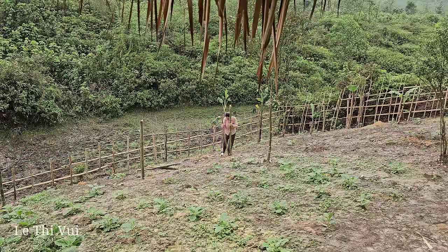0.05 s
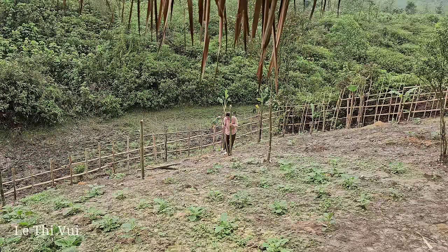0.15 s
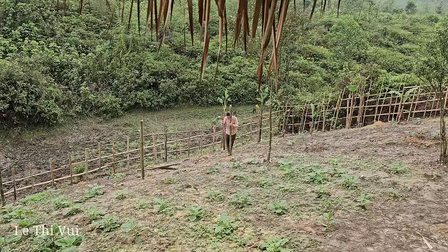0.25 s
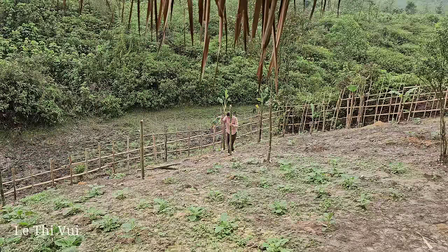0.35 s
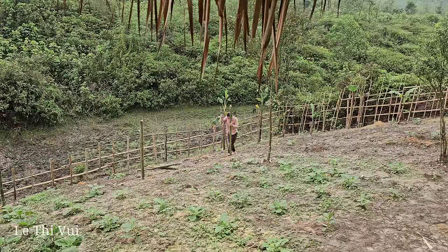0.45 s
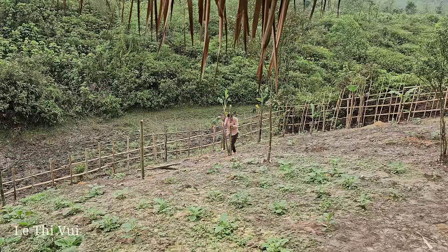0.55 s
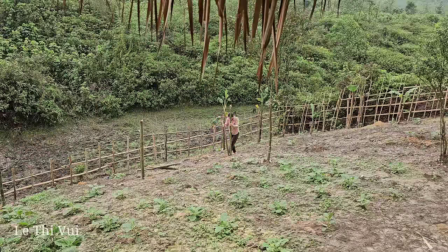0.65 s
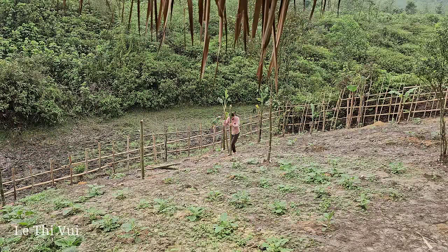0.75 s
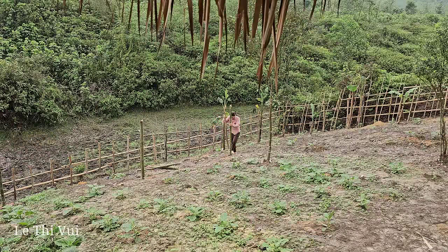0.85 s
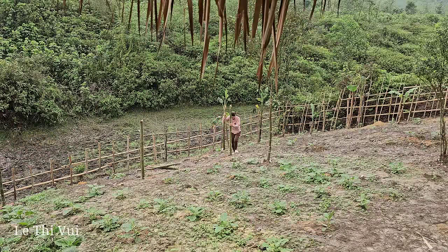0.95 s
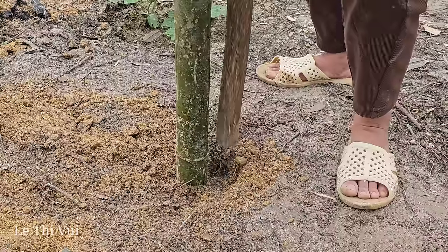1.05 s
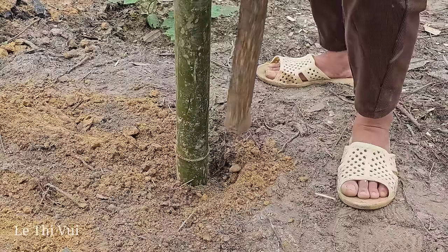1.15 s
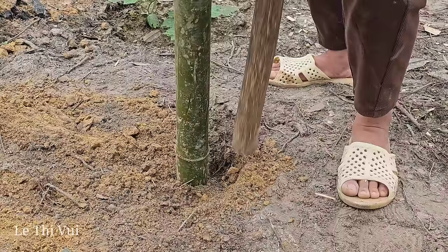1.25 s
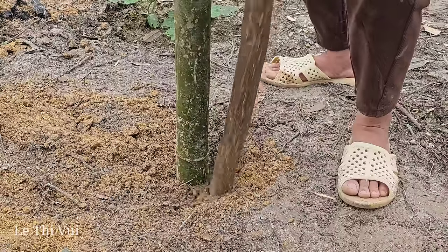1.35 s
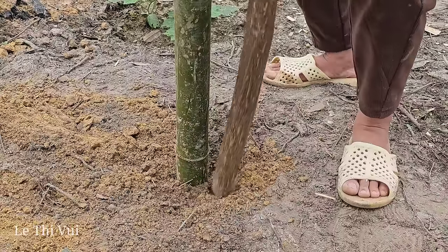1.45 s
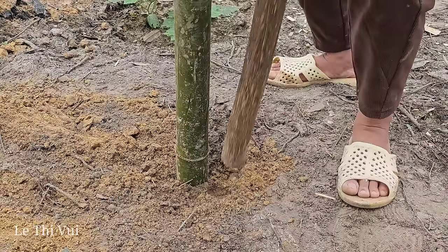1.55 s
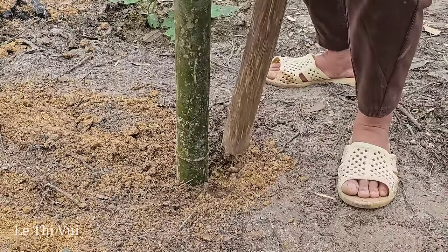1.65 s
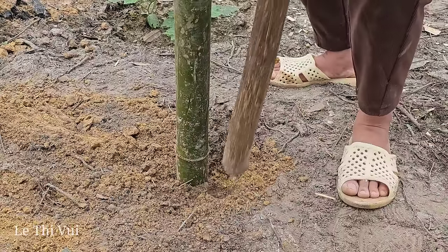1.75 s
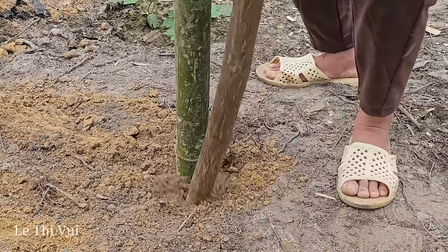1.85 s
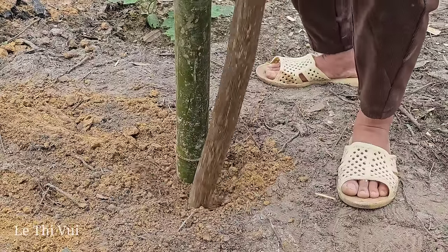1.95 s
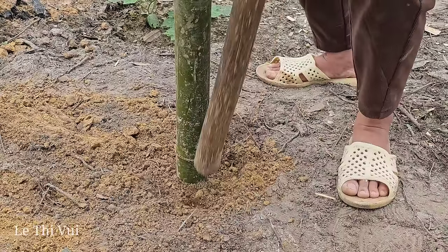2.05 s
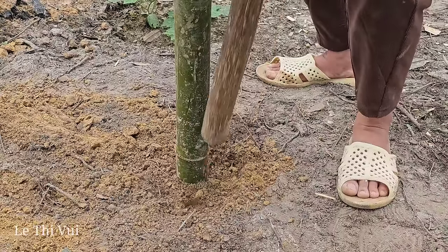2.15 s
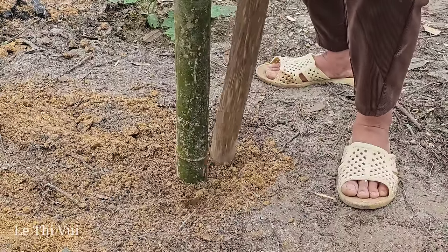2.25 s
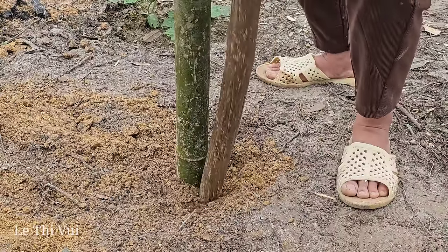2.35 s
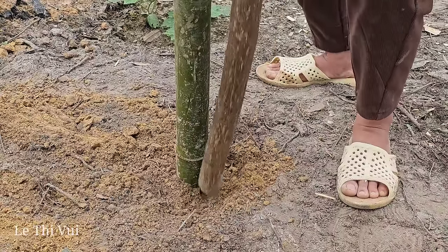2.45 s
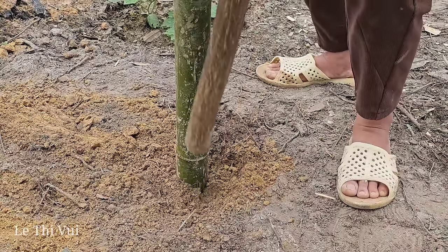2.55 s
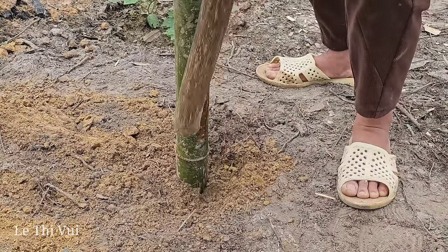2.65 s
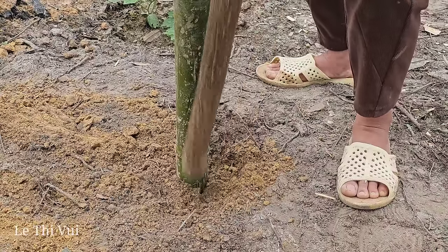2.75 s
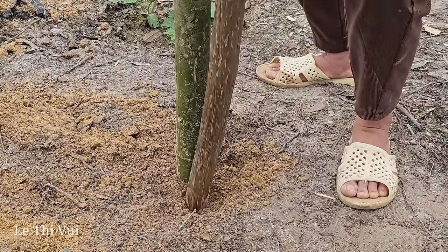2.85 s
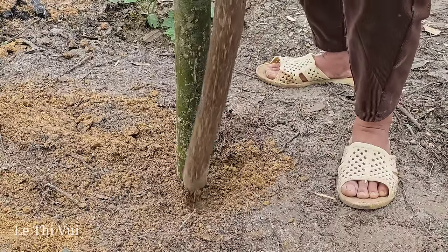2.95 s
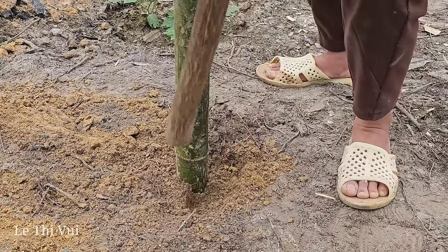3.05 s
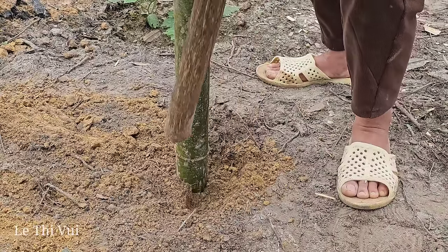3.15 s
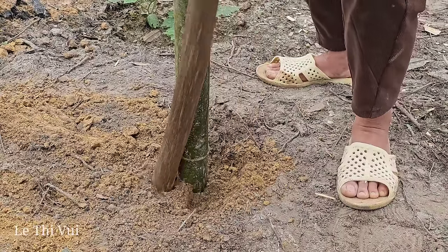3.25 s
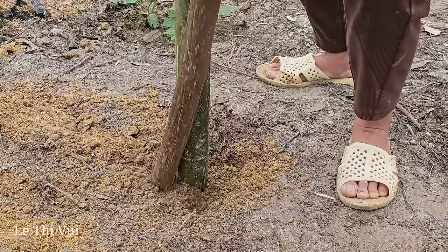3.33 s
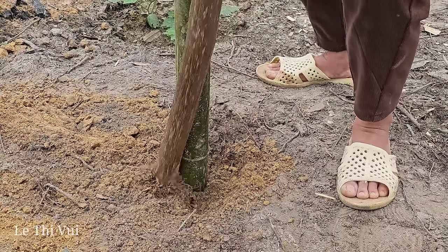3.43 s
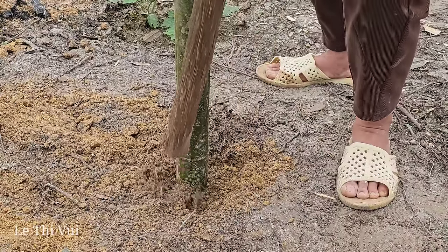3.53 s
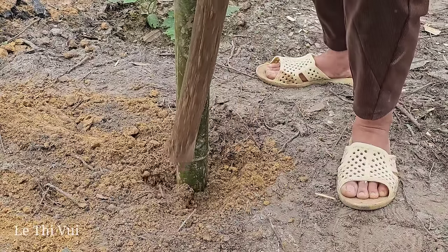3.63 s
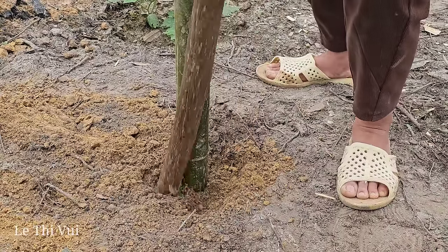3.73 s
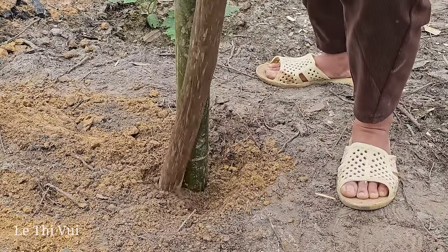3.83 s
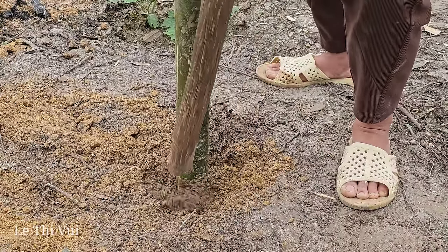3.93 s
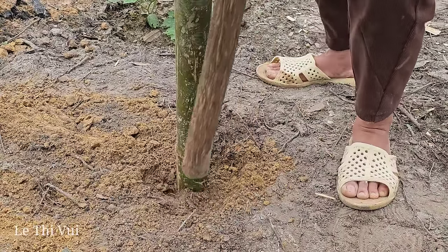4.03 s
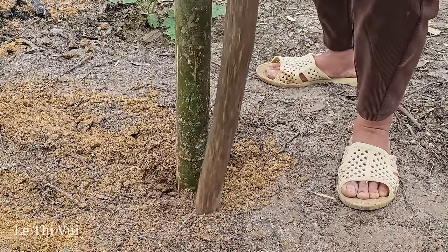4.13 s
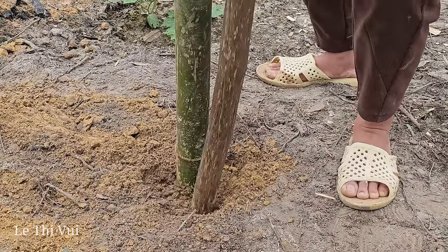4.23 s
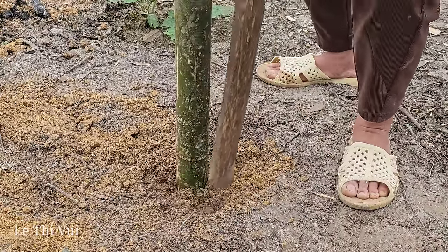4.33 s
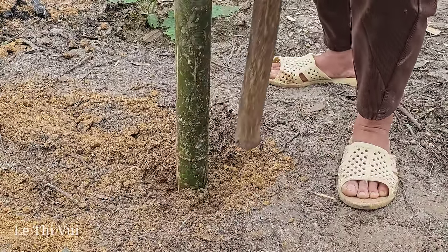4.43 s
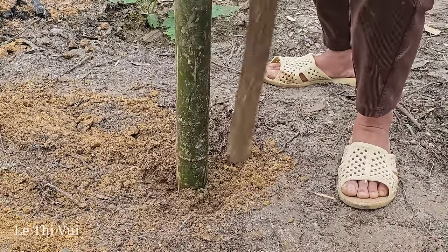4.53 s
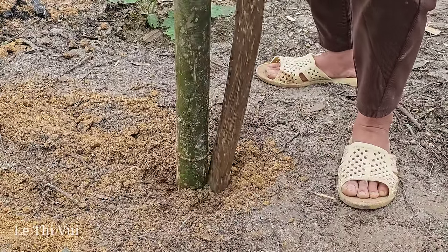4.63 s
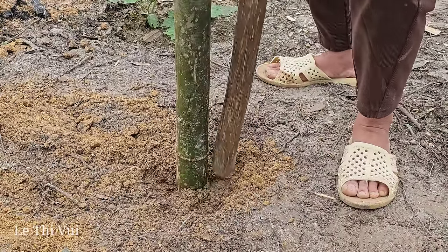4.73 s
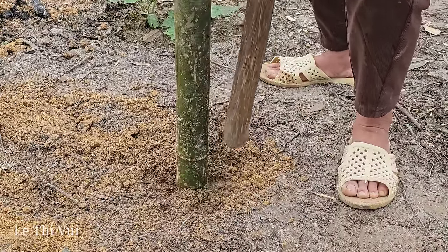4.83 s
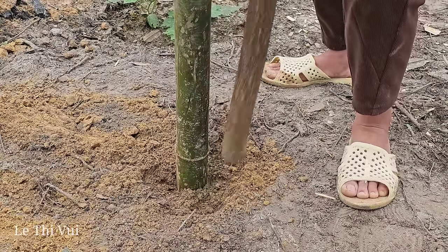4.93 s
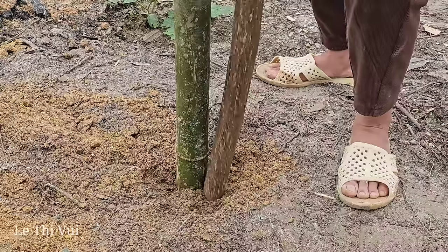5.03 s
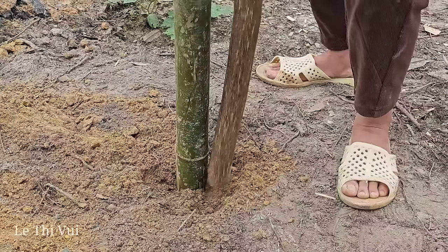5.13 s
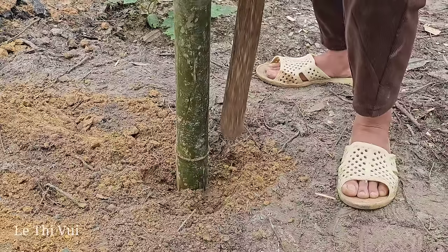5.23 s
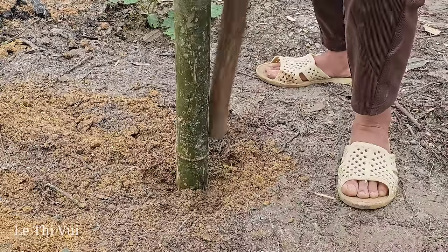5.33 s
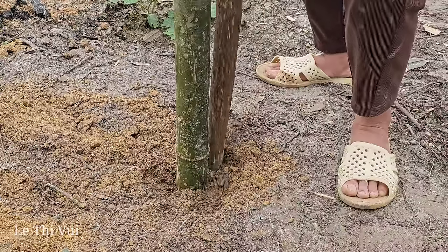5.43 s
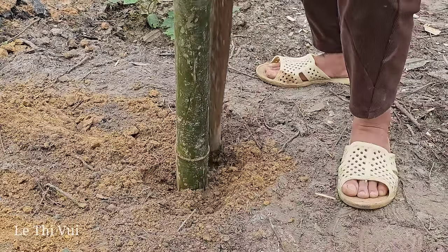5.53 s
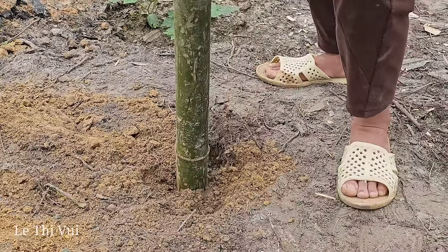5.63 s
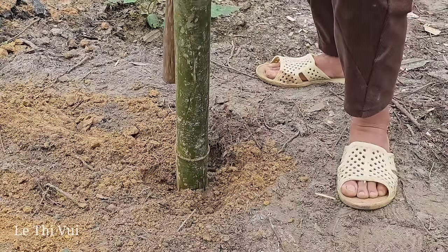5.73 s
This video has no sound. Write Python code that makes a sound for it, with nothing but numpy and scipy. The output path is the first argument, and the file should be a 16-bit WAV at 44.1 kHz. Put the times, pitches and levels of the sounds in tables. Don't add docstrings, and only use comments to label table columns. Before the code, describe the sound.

First quiet and far: thin air, insect bands, four soft dove hoots, tiny taps. Then abruptly near: two earthy, muffled tamps, followed by loud dry clacks of wood on hollow bamboo, each with a gritty crackle and a low thud through the ground slightly after. One softer soil-only blow interrupts them. Insects chirr steadily, small birds whistle, low wind rumbles; open air, little echo, work close and slightly left.

```python
import sys
import numpy as np
from scipy import signal
from scipy.fft import rfft, irfft
from scipy.io import wavfile
from scipy.ndimage import uniform_filter1d

SR = 44100
rng = np.random.default_rng(int(sys.argv[2]) if len(sys.argv) > 2 else 0)


def file_out(sig):
    cols = np.atleast_2d(sig).T
    lim = np.clip(cols, -1, 1)
    pcm = np.round(lim * 32767).astype(np.int16)
    wavfile.write(sys.argv[1], SR, pcm)


def voltage_ratio(level):
    return 10 ** (np.asarray(level, float) / 20)


N = 254898
T = np.arange(N) / SR
CUT_S = 1.18
POLE_PAN_DB, SOIL_PAN_DB = 1.32, 0.65
BELL_S = 0.015


def evened(x):
    return x / np.sqrt(np.mean(x ** 2) + 1e-20)


def read(points, hz):
    f, value = np.transpose(points)
    return np.interp(np.log(hz + 1), np.log(f + 1), value)


def add(mix, s, sound, pan_db):
    part = mix[:, max(round(s * SR), 0):][:, :sound.shape[-1]]
    part += voltage_ratio(np.array([[pan_db / 2], [-pan_db / 2]])) * sound[..., :part.shape[1]]


def noise(gain, size, patchy_db):
    # frequency in Hz, likeness of left and right from -1 to 1.
    likeness = [(60, 0.98), (150, -0.25), (380, 0.52), (950, -0.5), (2380, -0.19), (5980, -0.041),
                (15000, -0.00046)]
    frames, hz = 4 * N // size + 5, np.fft.rfftfreq(size, 1 / SR)
    a, b, c, d, patches = rng.standard_normal((frames, len(hz), 5)).T
    patches = uniform_filter1d(patches, size=9, axis=0)
    patches = evened(uniform_filter1d(patches, size=9, axis=1))
    same = np.clip(read(likeness, hz), -1, 1)[:, None]
    left = a + 1j * b
    right = same * left + np.sqrt(1 - same ** 2) * (c + 1j * d)
    z = np.array([left, right]) * gain(hz)[:, None] * voltage_ratio(patchy_db * patches)
    return evened(signal.istft(z, nperseg=size, noverlap=3 * size // 4)[1][:, :N])


def garden():
    # frequency in Hz, density in dB per Hz.
    air_far = [(150, -7.5), (300, -13), (410, -21), (600, -16.5), (1000, -21.5), (2200, -25.5),
               (4000, -21.5), (5100, -27), (5600, -34), (6300, -25.5), (9500, -34), (11000, -43),
               (15000, -37)]
    air_near = [(150, -3), (300, -12.5), (420, -9.5), (600, -13), (1000, -14), (2200, -17), (4000, -14.5),
                (5500, -22.5), (7000, -21.5), (10000, -34), (15000, -34)]
    # centre in Hz, width in Hz, far level in dB, near level in dB.
    choruses = [(2060, 60, -89, -87.5), (2806, 350, -75.5, -67), (3230, 920, -71, -64.5),
                (4620, 400, -75.5, -79.5), (7440, 440, -80, -77.5), (8060, 620, -86.5, -75),
                (8480, 2000, -88.5, -76), (11900, 500, -108, -97.5)]
    # frequency in Hz, density in dB per Hz.
    wind_far = [(15, -18), (30, -20), (45, 8.5), (60, -13.5), (140, -16.5), (250, -15), (330, -44),
                (500, -90)]
    wind_near = [(10, -31.5), (20, -15.5), (35, -3.5), (58, -1.5), (100, -12.5), (140, -19.5), (250, -25.5),
                 (330, -42), (500, -88)]
    # time in seconds, level in dB.
    gusts = [(0.0, -80), (.348, -72), (.524, -81.5), (.742, -69), (.954, -77), (1.17, -79), (1.19, -55),
             (1.24, -61), (1.36, -57.5), (1.64, -62), (2.8, -63.5), (2.95, -53.5), (3.11, -62.5),
             (3.72, -64.5), (4.9, -63.5), (5.78, -64)]
    flicker_db = 0.6
    near = np.clip((T - CUT_S) / 0.0087, 0, 1)
    far_air = noise(lambda f: voltage_ratio(read(air_far, f)) * (f > 120), size=1024, patchy_db=flicker_db)
    near_air = noise(lambda f: voltage_ratio(read(air_near, f)) * (f > 120), size=1024, patchy_db=flicker_db)
    out = (1 - near) * voltage_ratio(-71.5) * far_air + near * voltage_ratio(-65) * near_air
    for hz, width, far_db, near_db in choruses:
        band = noise(lambda f: 1 / (1 + (2 * (f - hz) / width) ** 4), size=512, patchy_db=2 * flicker_db)
        out += voltage_ratio(far_db + near * (near_db - far_db)) * band
    far_wind = noise(lambda f: voltage_ratio(read(wind_far, f)), size=4096, patchy_db=2.0)
    near_wind = noise(lambda f: voltage_ratio(read(wind_near, f)), size=4096, patchy_db=2.0)
    gust_db = np.interp(T, *np.transpose(gusts)) + 6.5
    out += voltage_ratio(gust_db) * ((1 - near) * far_wind + near * near_wind)
    return out * voltage_ratio(np.array([[.5], [-.5]]))


def whistle(length, start_hz, end_hz, db, fade_db):
    hold = 0.14
    u = np.linspace(0, 1, round(length * SR))
    slide = np.maximum(u - hold, 0) / (1 - hold)
    hz = start_hz + (end_hz - start_hz) * slide ** .8
    flutter = evened(uniform_filter1d(rng.standard_normal(SR // 6), size=300))[:len(u)]
    note = np.sqrt(2) * np.sin(2 * np.pi * np.cumsum(hz) / SR)
    note = note * signal.windows.tukey(len(u), .25) * voltage_ratio(db + fade_db * slide + 2.6 * flutter)
    t = np.arange(SR // 12) / SR
    leaves = rng.standard_normal(len(t)) * voltage_ratio(-28.0 - 60 * t / 0.159)
    leaves[0] = 1
    return signal.fftconvolve(note, leaves)


def small_birds():
    # start in seconds, length in seconds, start in Hz, end in Hz, level in dB.
    strays = [
        (0.014, 0.063, 2950, 2320, -71.5),
        (.289, 0.095, 587, 562, -80),
        (0.848, .022, 6300, 7750, -72),
        (1.008, 0.025, 6900, 6260, -73),
        (5.621, 0.077, 239, 227.6, -67.5),
    ]
    # start in seconds, level in dB.
    peeps = [
        (.36, -86),
        (.6, -86),
        (.87, -86),
        (3.6, -79),
        (3.98, -81),
        (4.38, -80),
        (4.745, -78),
        (5.155, -81),
        (5.54, -78.5),
    ]
    # start in seconds, level in dB.
    songs = [
        (3.514, -61),
        (3.893, -59.5),
        (4.291, -55),
        (4.652, -52.5),
        (5.063, -55),
        (5.445, -56),
    ]
    track = np.zeros((2, N))
    for s, *how in strays:
        add(track, s, whistle(*how, fade_db=-5), -3.0)
    for s, db in peeps:
        add(track, s, whistle(.05, 2070, 2070, db, fade_db=-5), -1.5)
    for s, db in songs:
        add(track, s, whistle(.096, 3970, 2060, db, fade_db=-24), -1.5)
    return track


def crunch(db, rise, t60, tilt_db):
    # frequency in Hz, density in dB per Hz.
    colour = [(180, -26.5), (300, -3), (1510, -14.5), (2480, -15.5), (3030, -15), (5520, -21),
              (8360, -25.5), (13800, -30.5), (16000, -44.5)]
    t = np.arange(SR // 4) / SR
    unevenness = evened(uniform_filter1d(rng.standard_normal(len(t)), size=30))
    grains = rng.standard_normal((3, len(t))) * voltage_ratio(2.2 * unevenness)
    hz = np.fft.rfftfreq(len(t), 1 / SR)
    middle = rfft(grains[0]) / (1 + (hz / 7000) ** 2)
    sides = hz ** 2 / (hz ** 2 + 4000 ** 2) * rfft(grains[1:])
    gain_db = read(colour, hz) + tilt_db * np.log2(hz / 4000 + 0.0051)
    pair = evened(irfft((middle + sides) * voltage_ratio(gain_db), len(t)))
    return pair * np.minimum(t / rise, 1) * voltage_ratio(db - 60 * np.maximum(t - rise, 0) / t60)


def soil_crunches():
    # start in seconds, level in dB, t60 in seconds.
    crushes = [(.128, -62.5, 0.26), (.656, -62, 0.095), (1.393, -36.5, 0.1), (1.884, -38, 0.12),
               (2.378, -29.5, 0.05), (2.846, -25.5, 0.068), (3.327, -35.5, 0.064), (3.773, -24, 0.043),
               (4.2105, -39.5, 0.14), (4.634, -29, 0.11), (5.058, -31, 0.05), (5.448, -36, 0.066)]
    # start in seconds, level in dB, t60 in seconds.
    trickles = [
        (.655, -67, 0.13),
        (3.593, -54, 0.23),
    ]
    # start in seconds, level in dB.
    scrapes = [
        (1.377, -44.5),
        (2.345, -41.5),
        (2.805, -35.5),
        (3.291, -40.5),
        (3.744, -40.5),
        (4.617, -42),
        (5.028, -47),
        (5.395, -53.5),
    ]
    # start in seconds, level in dB, t60 in seconds.
    puffs = [
        (1.396, -38, 0.1),
        (1.884, -47, 0.11),
        (1.904, -30, 0.028),
        (2.826, -25.5, .08),
        (4.21, -43, 0.091),
        (4.226, -37, 0.073),
        (5.046, -27.5, 0.096),
        (5.422, -33, 0.11),
    ]
    # start in seconds, level in dB, t60 in seconds.
    snaps = [
        (1.876, -44.5, 0.076),
        (2.363, -19, 0.088),
        (2.819, -26, 0.06),
        (3.309, -27, 0.091),
        (3.757, -32, 0.069),
        (5.043, -25.5, 0.084),
        (5.406, -26, 0.01),
        (5.413, -19, 0.029),
        (5.438, -37.5, 0.11),
    ]
    track = np.zeros((2, N))
    for s, db in scrapes:
        add(track, s, crunch(db, rise=.058, t60=.03, tilt_db=-1), SOIL_PAN_DB)
    for rows, rise, tilt_db in ((crushes, .0017, .29), (trickles, .004, 8.5), (puffs, .0043, -8),
                                (snaps, .0014, -2.1)):
        for s, db, t60 in rows:
            add(track, s, crunch(db, rise, t60, tilt_db), SOIL_PAN_DB)
    return track


def knock(modes, db, loudest_hz, ring, place):
    hz, mode_db, t60 = np.transpose(modes)[:, :, None]
    detune, lean = rng.standard_normal((2, len(modes)))
    clock = np.arange(SR // 9) / SR
    late = 0.001084 * np.sqrt(1000 / hz)
    t = np.maximum(clock - late + .0005, 0)
    turns = hz * (1 + 0.006 * detune[:, None]) * (clock - 2 * late)
    blow_db = -7.5 * np.log2(hz / loudest_hz) ** 2
    shape = abs(np.sin(np.pi * place * np.arange(1, len(modes) + 1)))[:, None] + 0.36
    dying_db = -60 * (t / (t60 * ring)) ** 1.8
    onset = 1 - np.exp(-t * hz / 1.2)
    rings = shape * voltage_ratio(mode_db + blow_db + dying_db) * onset * np.cos(2 * np.pi * turns)
    sound = voltage_ratio(1.6 * np.array([lean, -lean])) @ rings
    u = clock - .0009
    tick = np.exp(-.5 * (u / 0.00022) ** 2) * np.cos(2 * np.pi * 1.6 * loudest_hz * u)
    sound = sound / abs(sound).max() + voltage_ratio(-5.0) * tick
    return voltage_ratio(db) * sound / abs(sound).max()


def pole_knocks():
    # frequency in Hz, level in dB, t60 in seconds.
    pole_modes = [(500, 2.5, 0.054), (562, -2, 0.067), (972, 3.5, .045), (1330, -2, .04),
                  (1637, -1.5, 0.027), (1802, 0, .035), (1923, 1, 0.04), (2416, -3.5, 0.04),
                  (2640, 0, 0.023)]
    # start in seconds, peak in dB, loudest Hz, ring length factor, strike place from 0 to 1.
    blows = [(.131, -58, 1280, 0.22, 0.1), (0.1375, -46.5, 960, 0.78, 0.23), (.153, -49, 1900, 0.64, .11),
             (.658, -67, 1020, 1.5, .16), (1.149, -42.5, 1240, 1.46, 0.11), (1.219, -48.5, 1600, 0.47, 0),
             (1.875, -40, 1660, 1.4, 0.34), (2.3632, -5.5, 1714, 0.55, 0.47), (1.8863, -43, 1850, 0.8, 0.3),
             (2.8202, -4.5, 1500, 0.68, 0.25), (3.3068, -7.5, 1460, 0.66, 0.12),
             (3.329, -39, 1602, .38, 0.07), (3.431, -48, 2190, 0.66, 0.15), (3.446, -49.5, 1090, 1.2, .33),
             (3.757, -8.5, 946, 0.59, 0.29), (3.875, -50.5, 2300, 0.63, 0.03),
             (4.635, -5.5, 1004, 0.7, 0.32), (5.044, -5, 767, 0.76, 0.28), (5.414, -28.5, 896, 1.3, 0.24),
             (2.3683, -15, 1300, 0.58, .21), (2.825, -5, 620, .6, 0.2), (3.3117, -16, 1300, .5, .2),
             (3.3022, -35, 514, .45, 0.5), (2.359, -37, 500, .4, .3), (5.041, -37.5, 550, .4, 0.26)]
    track = np.zeros((2, N))
    for s, *how in blows:
        add(track, s, knock(pole_modes, *how), POLE_PAN_DB)
    return track


def post_knocks():
    # frequency in Hz, level in dB, t60 in seconds.
    post_modes = [(352, 2.5, 0.045), (778, -7.5, 0.08), (1190, -7, 0.041), (1446, -6, .04),
                  (2142, 0, 0.027), (2950, -4, 0.03014), (3070, -9.5, .03), (3590, -12, 0.027),
                  (3840, -9.5, 0.021), (4560, -5.5, 0.046), (5000, -11, 0.065)]
    # start in seconds, peak in dB, loudest Hz, ring length factor, strike place from 0 to 1.
    blows = [(.138, -53.5, 960, 0.36, 0.36), (1.148, -40, 1210, 0.33, .21), (1.395, -37, 2270, 0.28, 0.44),
             (2.3628, -3.5, 1310, 0.57, .18), (2.408, -34, 906, 0.46, 0.4), (2.8202, -5, 1440, 0.5, 0.12),
             (3.307, -5, 850, 0.52, 0.03), (3.445, -50, 1190, 0.68, 0.2), (3.757, -7.5, 804, 0.5, 0.05),
             (4.212, -62.5, 1494, 0.34, .2), (4.634, -6.5, 973, 0.72, 0.11), (5.044, -4.5, 1048, 0.5, .17),
             (5.406, -22, 650, 0.33, 0.2), (5.411, -12.5, 737, 0.5, 0.19), (2.825, -2.5, 703, .5, 0.06),
             (4.6395, -16.5, 1155, .45, .16), (5.0488, -15.5, 1150, 0.36, 0.17)]
    track = np.zeros((2, N))
    for s, *how in blows:
        add(track, s, knock(post_modes, *how), 0.5)
    return track


def bell_tone(db, hz, width):
    u = np.arange(SR // 30) / SR - BELL_S
    return voltage_ratio(db) * np.exp(-.5 * (u / width) ** 2) * np.cos(2 * np.pi * hz * u)


def wood_swells():
    # time of the top in seconds, peak in dB, frequency in Hz, width in seconds.
    swells = [(0.1416, -54, 960, .003), (2.368, -17, 495, 0.0038), (2.3695, -16.5, 978, 0.0028),
              (2.8215, -13.5, 1760, 0.00084), (2.829, -14, 562, 0.0043), (3.313, -8.5, 972, 0.0029),
              (3.312, -20, 381, 0.0041), (4.639, -15.5, 1190, 0.0029), (5.0455, -12.5, 1040, .001),
              (5.051, -13.5, 990, 0.0028), (5.05, -14.5, 506, 0.0039)]
    track = np.zeros((2, N))
    for s, *how in swells:
        add(track, s - BELL_S, bell_tone(*how), POLE_PAN_DB)
    return track


def clod_cracks():
    # time of the top in seconds, peak in dB, frequency in Hz, width in seconds.
    cracks = [(.1545, -53.5, 2650, .0006), (1.3932, -46, 3000, .0005), (1.3963, -32, 2460, .0005),
              (1.4035, -41, 2500, .0005), (1.8761, -35.5, 3020, .0008), (1.8875, -36.5, 3120, .0006),
              (1.8892, -36.5, 1700, .0012), (1.8996, -41, 2800, .0006), (1.9105, -32, 500, .001),
              (2.85, -24.5, 3050, .0008), (2.853, -25.5, 1500, .001), (3.3275, -31.5, 2100, .0008),
              (3.331, -33, 2800, .0006), (4.2134, -37.5, 1657, .0012), (4.2134, -38.5, 4550, .0005),
              (4.2173, -51, 3500, .0005), (4.222, -40, 4400, .0006), (4.2225, -41.5, 1790, .0015),
              (5.45, -39.5, 2900, .0008)]
    track = np.zeros((2, N))
    for s, *how in cracks:
        add(track, s - BELL_S, bell_tone(*how), SOIL_PAN_DB)
    return track


def yard(x):
    size = SR // 4
    taps = rng.choice([-1., 1.], (2, size)) * (rng.random((2, size)) < .06)
    taps = taps * voltage_ratio(-60 * np.arange(size) / SR / .11) * (np.arange(size) > 200)
    taps = signal.lfilter([.3], [1, -.7], taps)
    return signal.fftconvolve(x, taps / np.linalg.norm(taps[0]), axes=1)[:, :N]


def thump(db, hz, width, ring_db):
    # delay in seconds, level in dB.
    layer_echoes = [(.023, -14.5), (0.029, -15), (.044, -31), (0.065, -37.5)]
    # frequency in Hz, level in dB, t60 in seconds.
    ground_modes = [(45.95, -25.5, .3), (62, -21.5, 0.34), (79, -23.5, 0.33), (98, -15.5, 0.29),
                    (115, -18.5, 0.24), (131, -20, 0.35), (160, -26, 0.098), (206, -30, 0.27),
                    (225.3, -22, 0.16)]
    t = np.arange(SR // 2) / SR - .03

    def push(delay):
        u = t - delay
        slowing = 1 - 11 * np.clip(u, -.03, .03)
        swell = np.exp(-.5 * ((u + .002) / width) ** 2)
        return swell * np.cos(2 * np.pi * hz * u * slowing)

    echoes = sum(voltage_ratio(echo_db) * push(delay) for delay, echo_db in layer_echoes)
    ring = np.zeros(len(t))
    for f, mode_db, t60 in ground_modes:
        ring += voltage_ratio(mode_db - 60 * t / t60) * np.cos(2 * np.pi * (f * t + rng.random()))
    low_band = signal.butter(2, [60, 330], "band", fs=SR, output="sos")
    settling = signal.sosfilt(low_band, rng.standard_normal(len(t)))
    ring += evened(settling) * voltage_ratio(-19.0 - 60 * t / 0.041)
    sound = voltage_ratio(db) * (push(0) + voltage_ratio(ring_db) * (echoes + ring * np.clip(t / 0.0057, 0, 1)))
    lag = 14
    return np.array([np.r_[np.zeros(lag), sound[:-lag]], sound])


def ground_thumps():
    # crest in seconds, crest in dB, frequency in Hz,
    # width in seconds, after-ring in dB.
    low_thumps = [(0.172, -51, 143, 0.0075, 2), (0.6867, -49.5, 154, 0.0071, -8),
                  (1.17, -51.5, 166, .0064, -2), (1.4119, -14, 107, 0.0048, -5),
                  (1.896, -23, 131, 0.0014, -4), (1.915, -27.5, 94, 0.0063, 0.5),
                  (2.3861, -11, 105, 0.0039, -1.5), (2.864, -14.5, 86.5, .0045, 0),
                  (3.3408, -13.5, 105.5, 0.0025, -6.5), (3.461, -53, 198, 0.012, -13.5),
                  (3.7892, -13, 107.7, 0.0025, -4.5), (4.223, -23, 110.5, 0.0017, -3.5),
                  (4.2365, -16.5, 92.3, 0.0024, -4.5), (4.6566, -6.5, 113.5, 0.0033, -5),
                  (5.0663, -6.5, 98, 0.0045, -4.5), (5.418, -20.5, 160, 0.0034, -19.5),
                  (5.4612, -12.5, 110, 0.0048, -4.5), (2.369, -28.5, 209.5, .005, -27),
                  (2.828, -24, 217.6, .006, -29.5), (4.213, -32.5, 170, .003, -24),
                  (5.054, -19.5, 205, 0.0038, -29)]
    track = np.zeros((2, N))
    for s, *how in low_thumps:
        add(track, s - .028, thump(*how), 1.1)
    return track


def hoot(length, db, hz):
    rise_s, fall_s, depth_db, climb_hz_per_s = 0.044, 0.034, -20.5, 280
    t = np.arange(0, length, 1 / SR)
    edge = np.maximum(np.maximum(1 - t / rise_s, 1 - (length - t) / fall_s), 0)
    tone = np.sin(2 * np.pi * np.cumsum(hz + climb_hz_per_s * (t - length / 2)) / SR)
    return np.sqrt(2) * tone * voltage_ratio(db + depth_db * edge) * signal.windows.tukey(len(t), .2)


def dove():
    # start in seconds, length in seconds, level in dB, frequency in Hz.
    hoots = [
        (0.433, 0.087, -68, 309),
        (0.639, .11, -61.5, 323),
        (0.859, 0.13, -61.5, 330),
        (1.107, 0.11, -60, 331),
    ]
    track = np.zeros((2, N))
    for s, *how in hoots:
        add(track, s, hoot(*how), 1.5)
    return track


def squeak(length, db, hz):
    u = np.linspace(0, 1, round(length * SR))
    wobble = evened(uniform_filter1d(rng.standard_normal(2000), size=60))[:len(u)]
    tone = np.sin(2 * np.pi * np.cumsum(hz * (1 + .06 * wobble)) / SR)
    return voltage_ratio(db - 22.5 * (1 - u)) * signal.windows.tukey(len(u), .3) * tone


def squeaks():
    # end in seconds, length in seconds, level in dB, frequency in Hz.
    slides = [
        (2.363, 0.02, -38, 1495),
        (2.8178, .007, -20.5, 1950),
        (3.306, .008, -47.5, 1700),
        (4.627, .01, -44, 1388),
        (5.04, .02, -44.5, 1400),
    ]
    track = np.zeros((2, N))
    for s, length, *how in slides:
        add(track, s - length, squeak(length, *how), POLE_PAN_DB)
    return track


def scene():
    wood = pole_knocks() + post_knocks() + wood_swells() + squeaks()
    soil = soil_crunches() + clod_cracks() + ground_thumps()
    work = wood + voltage_ratio(-27.0) * yard(wood) + soil
    port_lag_s = .000055
    lag = np.exp(-2j * np.pi * np.fft.rfftfreq(N, 1 / SR) * port_lag_s)
    work[1] = irfft(rfft(work[1]) * lag, N)
    return work + small_birds() + dove() + garden()


def low_pass(x):
    return signal.sosfilt(signal.butter(12, 16500, fs=SR, output="sos"), x)


def record(dry):
    bass_cut = signal.butter(3, 38, "high", fs=SR, output="sos")
    x = np.clip(signal.sosfilt(bass_cut, dry), -.97, .97)
    treble_edge = signal.firwin(255, 15900, window=("kaiser", 4), fs=SR)
    mix = signal.oaconvolve(x, treble_edge[None], "same")
    return low_pass(mix)


dry = scene()
out = record(dry)
file_out(out)
```